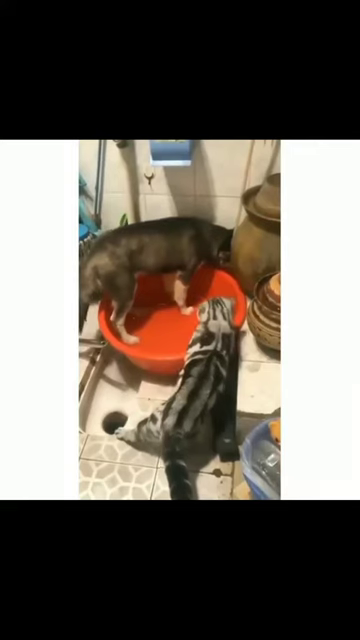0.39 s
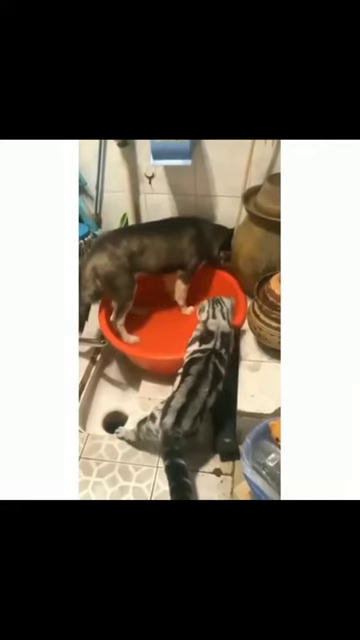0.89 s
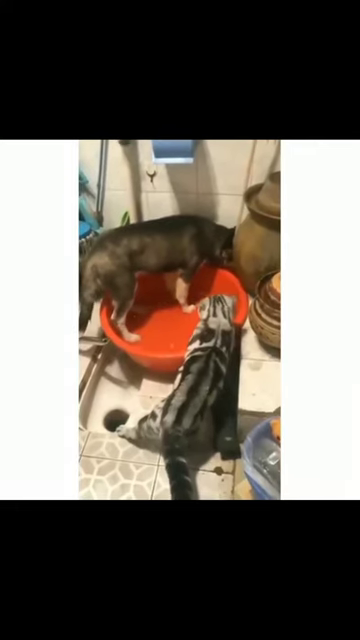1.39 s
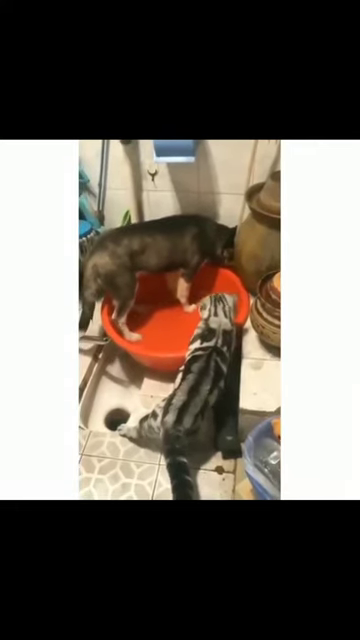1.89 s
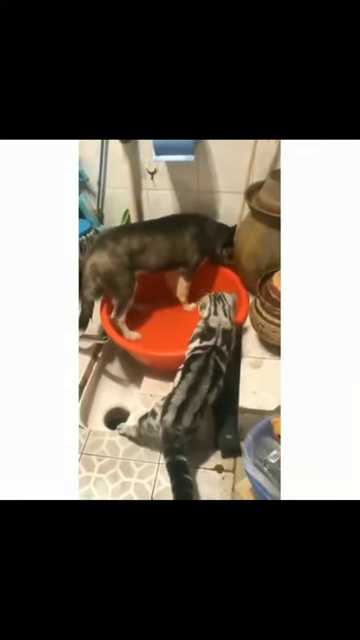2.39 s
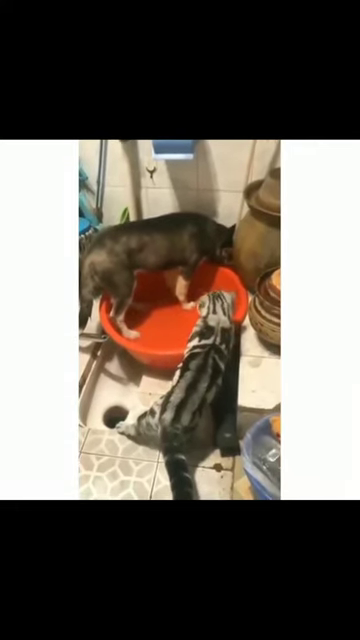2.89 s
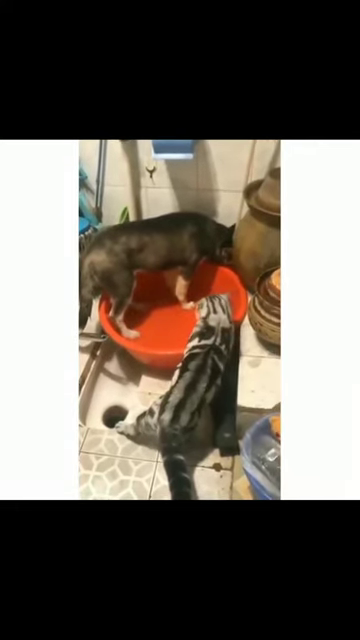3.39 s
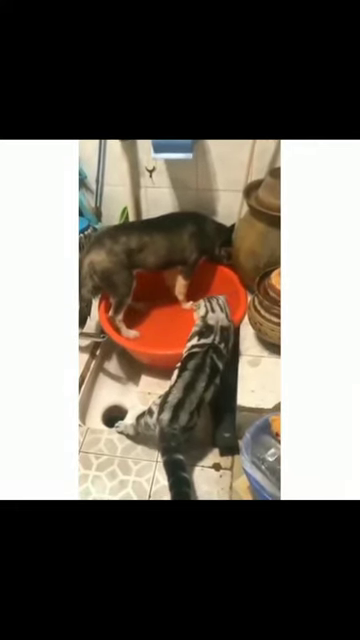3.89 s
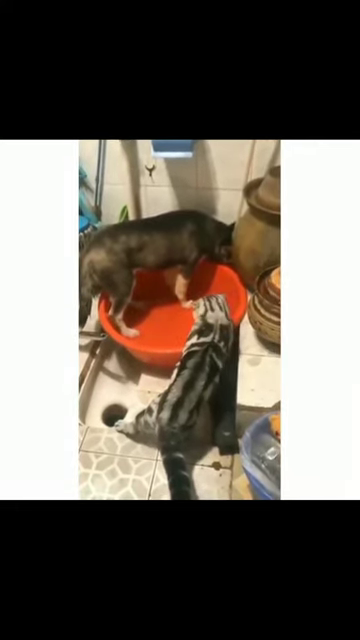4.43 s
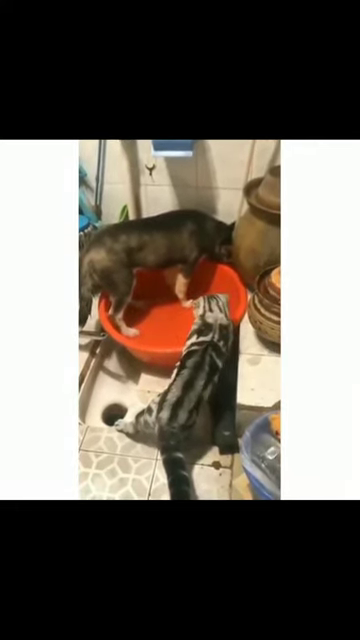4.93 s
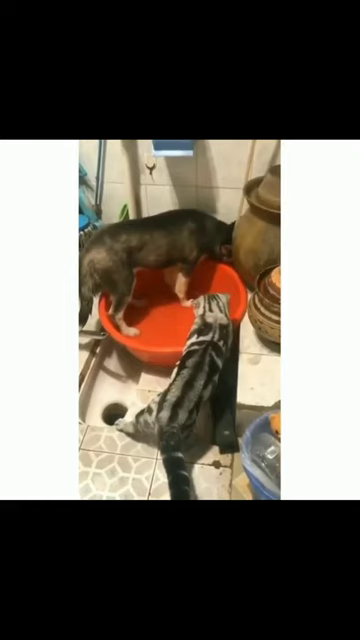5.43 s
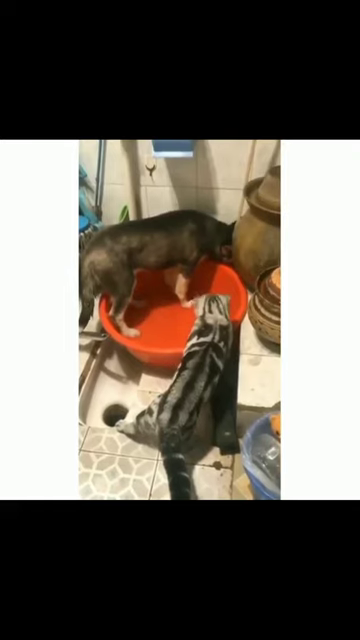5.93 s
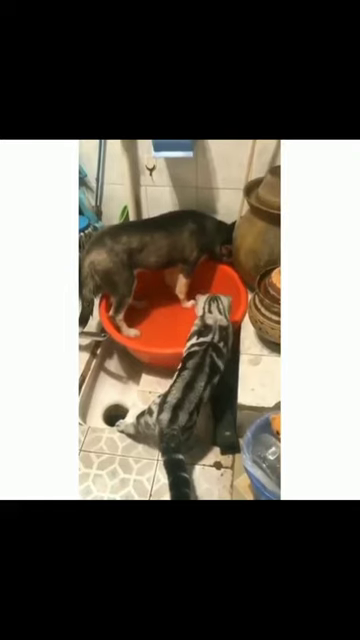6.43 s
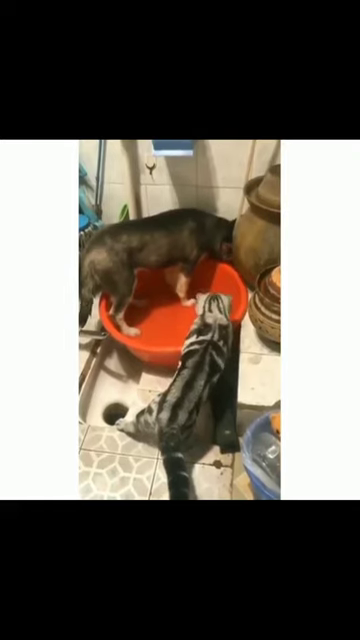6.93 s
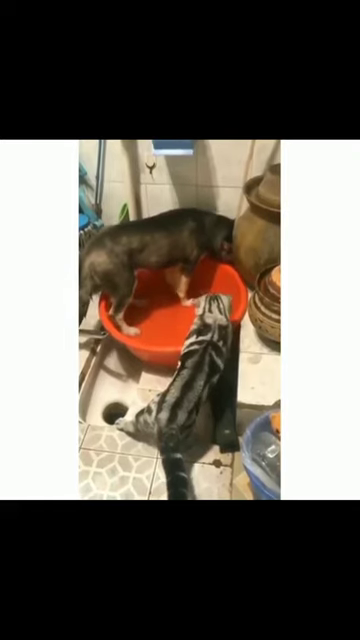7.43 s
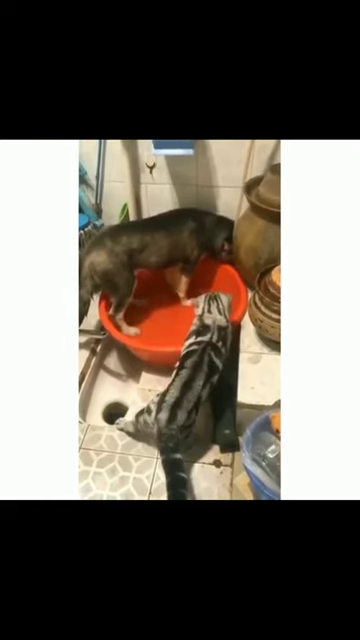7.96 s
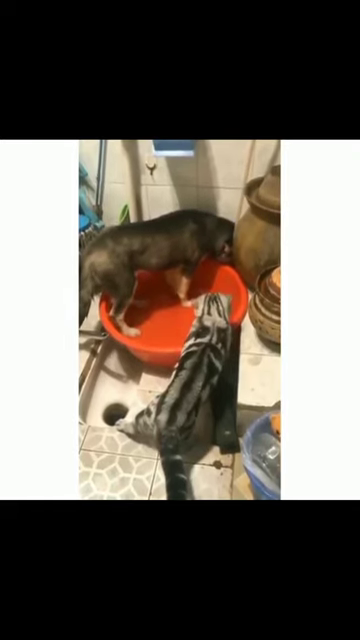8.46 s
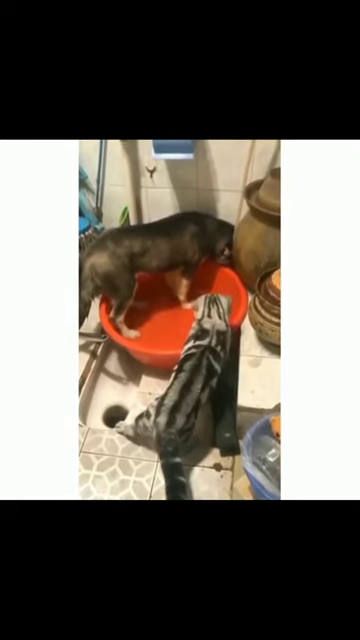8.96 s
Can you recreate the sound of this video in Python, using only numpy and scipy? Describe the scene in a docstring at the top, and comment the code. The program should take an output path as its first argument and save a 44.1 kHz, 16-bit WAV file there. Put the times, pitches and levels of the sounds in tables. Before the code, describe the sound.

Two cats face off over a plastic basin; yowling starts mid-wail, high, wavering and harsh, with rough cracks in the voice. It droops into a dark throaty growl, opens into a brief quieter cry, then pauses with faint drawn-in air. A short growl swells into another tense wail that continues to the end. Short bright tile reverberation smears the glides, over soft hum and hiss, recorded on a phone.

```python
"""A cat yowls in a small tiled bathroom: a long wail sinks into a growl, rises to a short cry, and after a pause
growls up into a new wail. The voice is stacked sine overtones shaped by a moving mouth; under strain its folds
alternate strong and weak beats, which adds lines halfway between the overtones. Growls are filtered slaps;
breath, puffs and intakes are coloured noise. One faint tick falls in the pause.
The tiles smear every glide; a low building hum of wavering sines and room hiss lie underneath."""
import sys
import numpy as np
from scipy import signal
from scipy.fft import rfft, irfft, next_fast_len
from scipy.io import wavfile
from scipy.ndimage import uniform_filter1d, minimum_filter1d, map_coordinates

SR = 44100
rng = np.random.default_rng(int(sys.argv[2]) if len(sys.argv) > 2 else 0)


def to_wav(s):
    """Save 16-bit WAV."""
    ch = np.atleast_2d(s).T  # columns
    pcm = np.round(np.clip(ch, -1, 1) * 32767)  # PCM
    wavfile.write(sys.argv[1], SR, pcm.astype(np.int16))


def decibels_to_gain(level_db):
    """Convert a level in decibels to a linear amplitude gain (20 dB per decade)."""
    exponent = np.asarray(level_db, float) / 20
    return 10 ** exponent


N = 400428  # samples

# Levels in the tables are those of each layer before scene() blends them.


def unit(x):
    """Scaled to rms 1."""
    return x / np.sqrt(np.mean(x ** 2) + 1e-20)


def along(points, hz):
    """(Hz, value) points read on a log frequency axis."""
    f, v = np.transpose(points)
    return np.interp(np.log(hz + 1), np.log(f + 1), v)


def curves(rows, t):
    """Each column after the time, read at times t."""
    s, *cols = np.transpose(rows)
    return [np.interp(t, s, c) for c in cols]


def span(rows, fade):
    """Sample times of a phrase and its soft on-off window."""
    start, end = rows[0][0], rows[-1][0]
    t = np.arange(round(max(start, 0) * SR), min(round(end * SR), N)) / SR
    return t, np.clip(np.minimum(t - start, end - t) / fade, 0, 1)


def add(out, x, s):
    """Mix x into out from time s."""
    part = out[round(s * SR):][:len(x)]
    part += x[:len(part)]


def wobble(rate, size):
    """A smooth random curve, rate knots a second."""
    knots = rng.standard_normal(int(size * rate / SR) + 4)
    return map_coordinates(knots, [np.arange(size) * rate / SR])


def filtered(x, response):
    """x times a response of frequency."""
    m = next_fast_len(len(x) + 8192)
    return irfft(rfft(x, m) * response(np.fft.rfftfreq(m, 1 / SR)), m)[:len(x)]


def noise(spectrum, size):
    """Coloured noise of rms 1."""
    return unit(filtered(rng.standard_normal(size), lambda hz: decibels_to_gain(along(spectrum, hz))))


def stack(phase, orders, gain, step, swell_db=3.5, flutter_db=3.0, calm=0):
    """Sines on multiples of one phase (steady part, scatter), each swelling on its own; gains set to rms 1."""
    swell_cap = 0.47  # swells stop at this many spreads, fades go deep
    gain = gain / np.sqrt(np.sum(gain ** 2, 0) / 2)
    at = np.arange(phase.shape[1])
    turns = rng.uniform(0, np.pi, len(orders))  # throat and walls delay each overtone differently
    total = 0
    for k, g, turn, c in zip(orders, gain, turns, calm + 0 * orders):
        swell = swell_db * np.minimum(wobble(11, len(at)), swell_cap)
        flutter = flutter_db * np.minimum(wobble(30, len(at)), 2 * swell_cap)
        tone = np.sin(k * (phase[0] + (1 - c) * phase[1]) + turn)
        total = total + np.interp(at, at[::step], g) * decibels_to_gain(swell + flutter) * tone
    return total


def dip(hz, centre_hz, depth_db, octaves):
    """Gain in dB around a band that a side cavity swallows; a negative depth lifts it."""
    return -depth_db * np.exp(-(np.log2(hz / centre_hz) / octaves) ** 2)


def vowel(hz, first_hz, sharp, second_db, wide):
    """Gain of the low tones through two mouth resonances; the second climbs as the jaw drops."""
    # Around the first resonance. Each row: share of its frequency, gain in dB at full sharpness.
    first_shape = [(.3, -42.5), (.66, -16), (1, 5.5), (1.35, -17), (2, -25), (3, -55), (5, -55)]
    shut_hz, open_hz, width_hz = 2350, 3000, 220  # second resonance
    second_hz = shut_hz + wide * (open_hz - shut_hz)
    first = decibels_to_gain(sharp * along(first_shape, hz / first_hz))
    return first + decibels_to_gain(second_db) / (1 + ((hz - second_hz) / width_hz) ** 2)


def spells(t, hz):
    """Gain of each halfway line: every spell of alternating beats sets in fast, holds and dies away."""
    # Spells. Each row: start in s, end in s, level at start and at end in dB before colour, dying in dB per s.
    doubling = [(0.82, 1.12, -48, -44, 144), (1.99, 2.26, -33, -37, 60), (3.858, 4.154, -61.5, -66, 99),
                (8.165, 8.38, -32.5, -35.5, 153.5), (8.421, 8.49, -32, -24, 85)]
    # Colours of the lines: two humps, one broad hump, one strong line. Each row: frequency in Hz, gain in dB.
    two_humps = [(300, -29), (950, -32), (1570, -5), (2200, -8), (2840, -2.5), (3470, -18), (4100, -29.5),
                 (6600, -23), (9000, -47.5), (13000, -45)]
    broad = [(300, -26), (920, -26.5), (1540, -14), (2150, -1.5), (2760, -6), (3380, -8.5), (4000, -13),
             (4700, -14), (5300, -25), (9000, -51), (13000, -54)]
    one_line = [(300, -36), (900, -34.5), (1500, -27), (2090, -3), (2700, -15), (3300, -29.5), (3900, -33),
                (4600, -24), (5200, -27), (5800, -40.5), (13000, -62)]
    colours = [two_humps, two_humps, two_humps, broad, one_line]  # one per spell
    onset_db_per_s = 401
    gain = decibels_to_gain(-120)
    for (start, end, from_db, to_db, dying), colour in zip(doubling, colours):
        db = np.interp(t, [start, end], [from_db, to_db])
        db = db - onset_db_per_s * np.clip(start - t, 0, None) - dying * np.clip(t - end, 0, None)
        gain = gain + decibels_to_gain(db + along(colour, hz))
    return gain


def phrase(out, rows, step=64):
    """One sung breath: five strong low tones, upper overtones, halfway lines and breath pulsing at the pitch."""
    # Mouth. Each row: time in s, first resonance in Hz, its sharpness 0-1, gain of the second resonance in dB.
    mouth = [(0, 1440, 0.4, -37), (.1, 1810, 0.6, -13.5), (.6, 1854, 0.84, -19), (1.3, 1857, 0.64, -24.5),
             (1.7, 1762, 0.92, -15.5), (1.92, 2130, 1, -17), (2.04, 2230, 1, -14), (2.12, 2000, 0.87, -17),
             (2.25, 1946, 1, -24), (2.5, 1886, 0.99, -19), (3.25, 1800, 0.79, -2.5), (3.42, 1320, 0.61, -1),
             (3.75, 1045, 0.43, -5), (3.95, 750, 0.61, -20.5), (4.2, 653, 1, -32), (4.3, 629, 0.66, -16),
             (4.5, 583, 0.86, -14), (4.7, 549, 0.68, -25.5), (5.22, 385, 0.86, -46), (5.31, 433, 0.85, -51),
             (5.43, 566, 1, -23), (5.52, 700, 0.96, -17.5), (5.64, 954, 1, -11), (5.75, 1440, 0.54, -7),
             (6.03, 1350, 0.38, -6), (7.58, 401, 0.55, -37), (7.74, 560, 0.5, -42), (7.79, 786, 0.5, -29),
             (7.85, 1080, 0.6, -29), (7.94, 1600, 0.64, -31), (8.05, 1480, 0.47, -14), (8.14, 1500, 0.6, 3),
             (8.22, 1500, 0.3, 3), (8.35, 1400, 0.35, 2), (8.45, 1580, 0.7, -3), (8.55, 1650, 0.32, -10),
             (8.62, 1770, 0.56, -4), (8.72, 1740, 0.79, -3), (9.08, 1590, 0.8, -10.5)]
    # Side cavities (nose, cheeks) swallow two moving bands. Each row: time in s, lower dip in Hz,
    # its depth in dB, upper dip in Hz, its depth in dB, lift of the lowest tone in dB.
    cavities = [(0, 2400, 9, 4300, 8, 0), (.3, 2450, 2.5, 4380, 3.5, -1), (.7, 2540, 1, 4350, 4.5, -0.5),
                (.9, 1190, 5, 4400, 2, -7), (1.1, 2500, 13, 5450, 5, 0), (1.3, 3010, 1, 5300, -1, 4),
                (1.55, 3070, 9, 5420, -12, 7), (1.75, 2440, -1, 4270, 4, 0), (2, 1260, 2, 4450, 8, 6),
                (2.3, 1260, -1.5, 4630, 2, -4), (2.8, 1220, -3, 4300, -1, 3.5),
                (3.1, 3000, 9, 5000, 6.5, 8.5), (3.3, 3000, 6.5, 5350, -3, 3), (3.55, 2234, 1, 3850, 2, -3),
                (3.75, 2105, 2, 4220, -4, 4.5), (3.9, 1420, 10, 3280, 3, 3.5), (4.1, 1782, 4, 3100, 0, -10),
                (4.3, 1700, 4, 2950, 8, -1.5), (4.6, 1573, 1.5, 2700, 12, -2),
                (5.22, 1208, 8, 2690, -4, -9), (5.5, 1420, 9, 3670, 15, 0),
                (5.62, 1900, -5, 3430, 21, 13.5), (5.75, 2120, 8, 3900, 17, 1),
                (5.83, 2140, 11, 3970, 12, -0.5), (5.95, 2200, 5, 3900, 16, 8),
                (6.07, 2060, 2, 3440, 3, -11), (7.58, 1150, 10, 2770, 3, -1), (7.72, 1330, 11, 3050, 5, 3),
                (7.82, 2100, 1, 3080, 12, 5), (7.92, 2240, 12, 4130, 13, 4), (8.03, 2350, 5, 4450, 8, -2),
                (8.14, 2440, 2, 4600, 0, 0), (8.24, 2450, 2, 4900, 23, -3), (8.36, 1830, 5, 4800, 8, 1),
                (8.5, 2400, -5.5, 4000, 7.5, 1), (8.62, 2400, -1, 3600, 18, 2.5),
                (8.74, 2370, 12, 3600, 6, 6), (8.85, 2360, -3, 5230, 5, 11), (9.08, 2130, 6, 3250, 12, -2)]
    # Raspy moments: beats land unevenly and air leaks. Each row: middle in s, half length in s,
    # extra timing scatter (relative, on top of the calm voice's).
    rasps = [(0, 0.19, 1.8), (0.319, 0.35, 1.26), (0.533, 0.08, 1), (0.81, 0.06, 0.7), (1.05, .1, .6),
             (1.21, .09, .6), (1.93, 0.15, 0.88), (3.065, 0.11, 0.94), (3.871, 0.29, 0.69),
             (4.1, 0.24, 0.57), (4.503, .2, 0.37), (5.537, 0.11, 1.4), (5.633, 0.085, 0.96),
             (5.8, 0.27, 0.49), (6.025, 0.12, 4.8), (7.86, 0.17, 1.34), (8.349, 0.32, 0.35),
             (8.621, .07, 0.42), (9.1, 0.39, 0.7)]
    # Upper overtones, mouth open. Each row: frequency in Hz, relative gain in dB.
    throat_open = [(2000, -37), (3400, 3), (3870, -2), (4470, -3.5), (4870, -1.5), (5480, -12.5),
                   (6440, -4), (7090, -21.5), (8110, -25.5), (9430, -20.5), (13000, -27), (16900, -61.5),
                   (22000, -120)]
    # Upper overtones, mouth nearly closed. Each row: frequency in Hz (climbs as the jaw drops), gain in dB.
    throat_shut = [(1350, -25.5), (2300, 1), (2600, -4), (3090, -7), (3960, -4.5), (4480, -24), (8000, -32),
                   (9000, -31), (11200, -31.5), (13000, -40.5), (16900, -81), (22000, -120)]
    # Colour of the leaking air. Each row: frequency in Hz, relative level in dB.
    breath_colour = [(200, -30), (600, -11), (1200, -22.5), (1900, -12.5), (3000, -9.5), (5000, -12.5),
                     (7000, -15.5), (9000, -40), (13000, -46)]
    calm_scatter, calm_breath_db, breath_db_per_doubling = 0.4, -48, 7  # breath is set against the low tones
    shut_hz, open_hz = 500, 1850  # first resonance, jaw shut and dropped
    bright_db, dull_hz, dull_octaves, dulling = -41, 5000, 0.73, 0.766  # dulling: dB lost per dB below bright
    clean_hz, clean_share = 8600, 0.25  # tones above this keep only this share of the scatter

    t, window = span(rows, 0.04)
    size, coarse = len(t), t[::step]
    pitch_hz, low_db, upper_db = curves(rows, t)
    first_hz, sharp, second_db = curves(mouth, coarse)
    low_dip_hz, low_dip_db, top_dip_hz, top_dip_db, lift_db = curves(cavities, coarse)
    rasp = calm_scatter + sum(more * np.clip(1 - abs(t - s) / half, 0, 1) for s, half, more in rasps)
    breath_db = calm_breath_db + breath_db_per_doubling * np.log2(rasp / calm_scatter)

    # folds never quite steady
    pitch_hz = pitch_hz * (1 + 0.0032 * wobble(30, size) + 0.00081 * wobble(200, size))
    # beats land early or late (in cycles)
    scatter = rasp / 100 * (3 * wobble(35, size) + 1.9 * wobble(90, size) + 0.57 * wobble(300, size))
    phase = 2 * np.pi * np.array([np.cumsum(pitch_hz) / SR, scatter / (2 * np.pi) * (2 * np.pi)])
    lows, orders, halfway = np.arange(1, 6), np.arange(6, 31), np.arange(21) + .5

    wide = np.clip((first_hz - shut_hz) / (open_hz - shut_hz), 0, 1)
    hz = np.outer(lows, pitch_hz[::step])
    cavity_db = dip(hz, low_dip_hz, low_dip_db, 0.11) + np.outer(lows == 1, lift_db)
    low_gain = decibels_to_gain(cavity_db) * vowel(hz, first_hz, sharp, second_db, wide)
    low = stack(phase, lows, low_gain, step, swell_db=3.0, flutter_db=2.5)

    hz = np.outer(orders, pitch_hz[::step])
    wide = np.clip(wide * sharp, 0, 1)  # a damped mouth also dulls the top
    faintness = np.clip(upper_db[::step] - bright_db, -10, 0)
    dull_db = dulling * faintness * np.clip(np.log2(hz / dull_hz) / dull_octaves, 0, 1)
    # resonances climb as the jaw drops
    throat_db = wide * along(throat_open, hz) + (1 - wide) * along(throat_shut, hz / (1 + 0.44 * wide))
    upper_gain = decibels_to_gain(dull_db + dip(hz, top_dip_hz, top_dip_db, 0.16) + throat_db)
    upper = stack(phase, orders, upper_gain, step, calm=(1 - clean_share) * (hz.max(1) > clean_hz))

    lines = spells(coarse, np.outer(halfway, pitch_hz[::step]))
    halves_level = np.interp(t, coarse, np.linalg.norm(lines, axis=0))
    halves = halves_level * stack(phase, halfway, lines, step, swell_db=2.5, flutter_db=3.5)

    pulse = 1 + .7 * np.cos(phase.sum(0))
    breath = decibels_to_gain(low_db + breath_db) * pulse * noise(breath_colour, size)
    shimmer = decibels_to_gain(1.3 * wobble(24.724, size))
    tones = shimmer * (decibels_to_gain(low_db) * low + decibels_to_gain(upper_db) * upper + halves)
    add(out, window * (tones + breath), t[0])


def tiles(x):
    """Each frequency of the room's answer dies at its own speed; gliding tones fade in and out through it."""
    # Decay of the room. Each row: frequency in Hz, time to fall 60 dB in s.
    decay = [(200, .35), (1200, 0.3), (3000, 0.25), (10000, 0.11)]
    hz, t, z = signal.stft(rng.standard_normal(SR // 2), SR, nperseg=256)
    tail = signal.istft(z * decibels_to_gain(-60 * t / along(decay, hz)[:, None]), SR, nperseg=256)[1]
    delayed = np.pad(x, (200, 0))  # the answer comes 200 samples late
    return signal.fftconvolve(delayed, tail / np.linalg.norm(tail))[:N]


def patchy(x, patchy_db):
    """Random patches of gain over time and frequency."""
    z = signal.stft(x, nperseg=512)[2]
    field = uniform_filter1d(rng.standard_normal(z.shape), size=4, axis=0)
    field = uniform_filter1d(field, size=20, axis=1)
    return unit(signal.istft(z * decibels_to_gain(patchy_db * unit(field)), nperseg=512)[1][:len(x)])


def background():
    """Room noise that drifts a little over a building hum of sines wavering in level and phase."""
    # Hum. Each row: frequency in Hz, level in dB.
    hum_tones = [(53.8, -59), (102.3, -55.5), (199.2, -62.5)]
    # Colour of the room noise. Each row: frequency in Hz, relative level in dB.
    air_colour = [(15, -41.5), (25, -25), (53, 0), (108, -8), (130, -6), (270, -12), (411, -14.5),
                  (444, -13.5), (811, -19.5), (924, -18), (1690, -21.5), (1880, -24), (1960, -16.5),
                  (2050, -26), (2500, -28), (3900, -32.5), (4800, -38), (8300, -41.5), (9000, -48.5),
                  (13000, -52.5), (16900, -83), (22000, -120)]
    t = np.arange(N) / SR
    hum = 0
    for hz, db in hum_tones:
        level = decibels_to_gain(db + 0.95 * wobble(6.9, N))
        hum = hum + level * np.sin(2 * np.pi * hz * t + 4.5 * wobble(4.1, N))
    air_level = decibels_to_gain(-53 + 0.6 * wobble(3.7, N))
    return hum + air_level * patchy(noise(air_colour, N), patchy_db=2.5)


def puff(out, s, db, t60):
    """A puff of air where the voice breaks: noise that jumps up and dies away."""
    t = np.arange(SR // 4) / SR
    shape = decibels_to_gain(db - 60 * t / t60) * (1 - np.exp(-t / 0.0017))
    colour = [(150, -39.0), (300, 3.0), (1000, -2.0), (2500, -19.0), (5000, -17.0), (12000, -35)]  # (Hz, dB)
    add(out, shape * noise(colour, len(t)), s)


def growl(out, start, end, from_db, to_db):
    """Slack folds slap unevenly about a hundred times a second behind a closed mouth."""
    # Closed-mouth modes. Each row: frequency in Hz, width in Hz, gain in dB.
    chest_modes = [(158, 34, 4), (215, 15, 1), (290, 53, -3.5), (428, 78, -1), (750, 150, -15.5),
                   (1150, 270, -25.5), (2200, 130, -24), (3840, 270, -31)]
    slaps_per_s, fade_s = 100, 0.028
    t, window = span([(start,), (end,)], fade_s)
    beats = np.cumsum(slaps_per_s * (1 + 0.11 * wobble(60, len(t)))) / SR
    slaps = np.diff(np.floor(beats), prepend=0) * decibels_to_gain(1.0 * wobble(90, len(t)))
    source = unit(slaps) + 0.32 * rng.standard_normal(len(t))

    def chest(f):
        """The modes side by side, with alternating sign."""
        return sum((-1) ** k * decibels_to_gain(db) * 1j * f * w / (c * c - f * f + 1j * f * w)
                   for k, (c, w, db) in enumerate(chest_modes))

    level = decibels_to_gain(np.linspace(from_db, to_db, len(t)) + 0.79 * wobble(16, len(t)))
    add(out, window * level * unit(filtered(source, chest)), t[0])


def intake(out):
    """Air drawn in between cries: noise in narrow throat resonances, coloured anew each time."""
    # Intakes. Each row: start in s, end in s, level in dB, favoured frequency in Hz.
    intakes = [(4.7, 5.449, -68.5, 2400), (6.181, 6.397, -60.5, 950), (6.546, 6.853, -76, 1970),
               (6.996, 7.293, -57, 1454), (7.329, 7.654, -59.5, 1844)]
    # Throat resonances. Each row: frequency in Hz, width in Hz, level in dB before the colouring.
    whisper = [(903, 43, -2.5), (1163, 18, -4), (1670, 120, -5.5), (1976, 160, -5.5), (2400, 104, -20),
               (2740, 200, -23), (3620, 220, -9)]
    loss_db_per_octave = 18  # away from the favoured frequency
    for start, end, db, near_hz in intakes:
        size = round((end - start) * SR)
        away = abs(np.log2(np.transpose(whisper)[0] / near_hz))
        colour = decibels_to_gain(1.9 * rng.standard_normal(len(whisper)) - loss_db_per_octave * away)
        hiss = filtered(rng.standard_normal(size), lambda f: sum(
            g * decibels_to_gain(level) / np.sqrt(w) / (1 + ((f - hz) / w * 2) ** 2)
            for g, (hz, w, level) in zip(colour, whisper)))
        add(out, decibels_to_gain(db) * np.hanning(size) ** .5 * unit(hiss), start)


def tick():
    """A claw on a tile: one faint tick of dying sines between the cries."""
    # Level in dB, then the modes. Each mode: frequency in Hz, level in dB, time to fall 60 dB in s.
    claw = (-59, [(2750, -3, .025), (5500, 0, .022), (8200, -10, .012)])
    out, t = np.zeros(N), np.arange(SR // 10) / SR
    db, modes = claw
    ring = sum(decibels_to_gain(level - 60 * t / t60) * np.sin(2 * np.pi * hz * t) for hz, level, t60 in modes)
    add(out, decibels_to_gain(db) * ring, 7.105)
    return out


def cat():
    """All phrases, growls, intakes of air and the puffs where the voice breaks."""
    # The three cries. Each row: time in s, pitch in Hz, level of the five low tones in dB,
    # level of the upper overtones in dB.
    wail = [(-0.04, 568, -30, -38.5), (0.04, 587.5, -31, -45), (0.13, 603.6, -23, -41.5),
            (0.3, 617, -23, -41.5), (0.56, 614.4, -18.5, -43), (0.73, 624, -16.5, -43),
            (0.91, 631.8, -16, -43), (0.94, 633.3, -15, -41), (0.98, 625, -17.5, -42),
            (1.13, 612.8, -21.5, -42.5), (1.19, 587.5, -18.5, -38), (1.26, 579, -29, -36),
            (1.32, 592.2, -17, -38.5), (1.56, 609.4, -24.5, -42.5), (1.62, 602.9, -16, -40.5),
            (2.02, 642.1, -18, -39), (2.24, 629, -13, -39.5), (2.38, 622.8, -16, -41),
            (2.62, 612.2, -23.5, -43), (2.67, 618, -14.5, -43.5), (2.84, 607, -22, -39.5),
            (2.87, 618.9, -16, -44), (3.05, 595, -22, -38.5), (3.08, 590.4, -20.5, -42),
            (3.25, 598.3, -16.5, -41.5), (3.38, 585.9, -28.5, -40.5), (3.78, 518.2, -33, -46),
            (3.84, 480.2, -30, -53), (3.98, 459.8, -34.5, -56), (4.25, 428, -33, -58),
            (4.57, 387.9, -31.5, -58), (4.68, 397.5, -43, -68)]
    cry = [(5.22, 355.3, -28, -79), (5.271, 380.3, -45.5, -78), (5.34, 386.6, -37, -64),
           (5.391, 405.5, -29.5, -66), (5.447, 436, -44.5, -62), (5.505, 471.2, -38.5, -54),
           (5.609, 469.2, -33, -46), (5.639, 501.8, -29.5, -54), (5.722, 527.6, -34, -55),
           (5.835, 539.8, -38, -54), (5.922, 549.5, -39, -52.5), (5.97, 537.3, -39.5, -56.5),
           (6.019, 485, -42.5, -57), (6.07, 451, -50, -66)]
    last_wail = [(7.58, 381.7, -43, -83), (7.7, 432, -40.5, -90), (7.76, 493.2, -43.5, -66.5),
                 (7.85, 530.5, -41, -62), (7.874, 523.7, -33.5, -49), (7.93, 561.8, -36, -48),
                 (8.11, 610.2, -37.5, -44), (8.241, 614.5, -36.5, -47.5), (8.4, 606, -34.5, -48.5),
                 (8.55, 596.5, -37.5, -49.5), (8.61, 592, -30.5, -51), (8.67, 593.2, -28, -49.5),
                 (8.724, 591.5, -23.5, -53), (8.865, 581, -29.5, -51), (8.951, 547, -26.5, -49),
                 (9.12, 519.6, -18, -44.5)]
    # Growls. Each row: start in s, end in s, level at start in dB, level at end in dB.
    growls = [(4.647, 5.321, -44, -41.5), (7.381, 7.685, -45, -47)]
    # Voice breaks. Each row: time in s, level in dB, time to fall 60 dB in s.
    breaks = [(1.95, -37, 0.09), (1.985, -38.5, 0.14)]
    out = np.zeros(N)
    for rows in (wail, cry, last_wail):
        phrase(out, rows)
    for row in growls:
        growl(out, *row)
    intake(out)
    for row in breaks:
        puff(out, *row)
    return out


def limited(x):
    """The limiter turns the loudest swells down smoothly."""
    limit, hold = 0.47, 1800  # loudest swing let through; samples it looks around
    need = np.minimum(1, limit / (abs(x) + 1e-9))
    return x * uniform_filter1d(minimum_filter1d(need, size=hold), size=hold // 2)


def scene():
    """The cat and the tick, direct and off the tiles, over the room noise and hum."""
    voice = cat() + tick()
    return (decibels_to_gain(-2.0) * voice + decibels_to_gain(-4.5) * tiles(voice) + background())[None]


def band_limit(x):
    """A steep low-pass at the top of the band."""
    return signal.sosfilt(signal.butter(12, 13130, fs=SR, output="sos"), x)


def record(dry):
    """A phone's limiter finishes the mix."""
    mix = limited(dry)
    return band_limit(mix)


dry = scene()
out = record(dry)
to_wav(out)
```